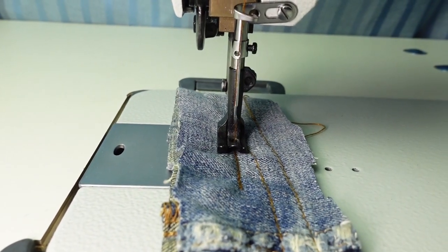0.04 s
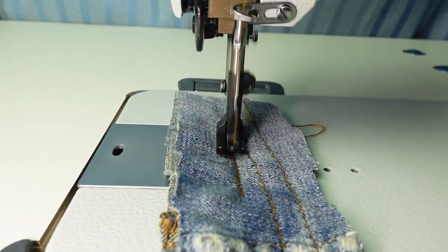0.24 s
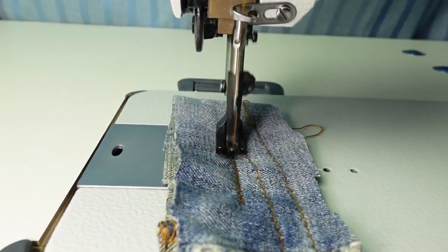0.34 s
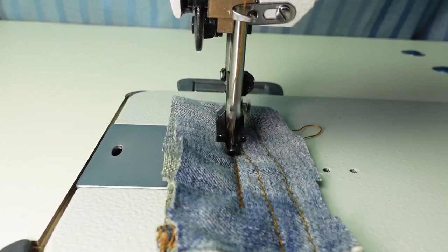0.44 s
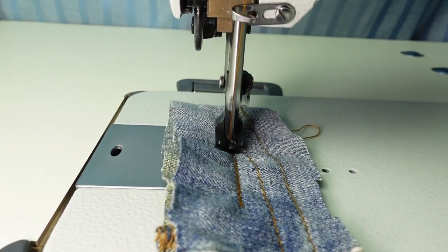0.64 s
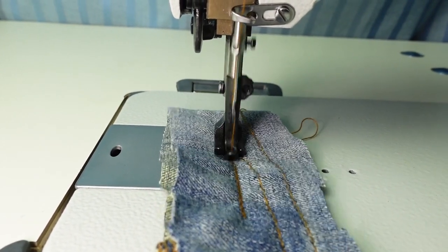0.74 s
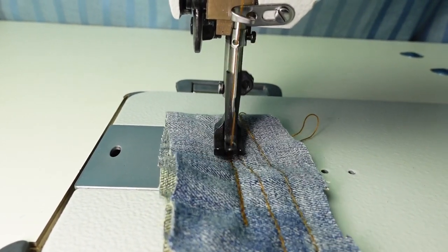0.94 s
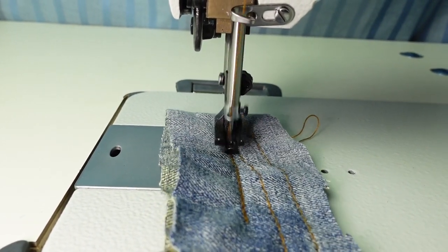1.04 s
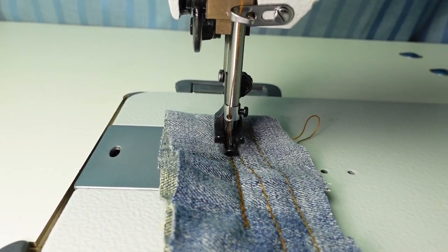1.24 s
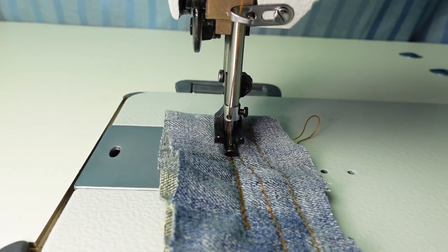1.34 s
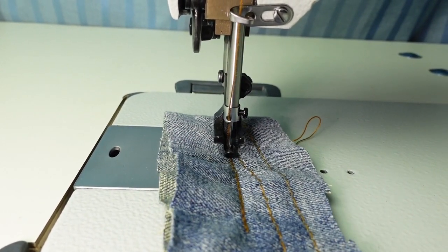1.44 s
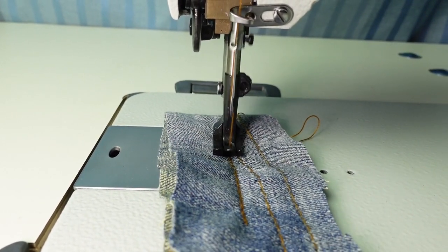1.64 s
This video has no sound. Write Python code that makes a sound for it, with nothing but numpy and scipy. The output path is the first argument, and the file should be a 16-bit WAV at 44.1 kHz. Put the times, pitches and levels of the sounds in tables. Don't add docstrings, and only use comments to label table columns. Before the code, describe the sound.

A heavy sewing machine starts up with a dense metallic clatter and low thrum, slows to separate clicks and knocks, pauses, then a sprung lever snaps loudly; close microphone in a small garage with short echo.

```python
import sys
import numpy as np
from scipy import signal
from scipy.fft import rfft, irfft
from scipy.io import wavfile
from scipy.ndimage import uniform_filter1d

SR = 44100
rng = np.random.default_rng(int(sys.argv[2]) if len(sys.argv) > 2 else 0)


def persist_wave(psi):
    counts = np.round(np.clip(psi, -1, 1) * 32767).astype(np.int16)
    wavfile.write(sys.argv[1], SR, np.atleast_2d(counts).T)


def invert_db(x):
    u = np.asarray(x, float) / 20
    return 10 ** u


N = 74970

# (pitch [Hz], level [dB], time to fade by 60 dB [s])
STEEL_MODES = [(1560, -11.5, 0.036), (1700, -0.5, 0.038), (2200, -6.5, 0.11), (2668, -17, 0.018),
               (2840, -5, 0.071), (3115, -9, 0.053), (3428, 4, 0.01), (3585, -32, 0.074),
               (4640, -11, 0.046), (5980, -3.5, 0.0063), (6895, -12, 0.11), (7470, -9.5, 0.026),
               (9570, -9, 0.009), (10940, -24, 0.013)]
# (pitch [Hz], level [dB], time to fade by 60 dB [s])
BED_MODES = [(325, -7, 0.12), (442, -14, 0.05), (489.4, -4.5, 0.059), (584.6, -3.5, 0.032), (653, -7, 0.03),
             (756, -3, 0.019), (915, -1.5, 0.029), (1070, -6.5, 0.11), (1192, -11.5, 0.12),
             (1465, -10.5, 0.035)]
TOP_HZ = 16150


def level(x, db):
    return x * invert_db(db) / np.sqrt(np.mean(x ** 2))


def top(x):
    return x / np.abs(x).max()


def colour(x, shape):
    hz, db = np.array(shape).T
    f = np.arange(N // 2 + 1) * SR / N + 1
    gain = invert_db(np.interp(np.log(f), np.log(hz), db))
    return irfft(rfft(x) * gain, N)


def band(x, edges_hz):
    return signal.lfilter(*signal.butter(2, edges_hz, "band", fs=SR), x)


def ring(x, hz, t60):
    pole = np.exp(2j * np.pi * hz / SR - np.log(1000) / (max(t60, .005) * SR))
    return signal.lfilter([1], [1, -pole], x).imag


def walk(rate):
    k = int(SR / rate)
    steps = np.repeat(rng.standard_normal(N // k + 1), k)
    return 0.75 * uniform_filter1d(uniform_filter1d(steps, k), k)[:N]


def favour(modes, hz, width):
    distance = np.log(np.array(modes)[:, 0] / hz[:, None])
    return 10 * np.exp(-(distance / width) ** 2)


def strike(times, peak_db, mode_db, modes, scrape_s, clatter_db, crack_db,
           clatter_hz=(830, 4100), crack_s=0.0082, crack_hz=(5600, 12480)):
    contact_rise_s, clatter_s, detune = 0.00068, 0.0089, .012
    t = np.arange(4000) / SR
    out = np.zeros(N + len(t))
    for s, db, gains, bright_db in zip(times, peak_db, mode_db, crack_db):
        chance = rng.standard_normal((4, len(t)))
        contact = chance[0] * np.exp(-t / scrape_s) * (1 - np.exp(-t / contact_rise_s))
        body = 0
        for gain, (hz, own_db, t60), shift in zip(gains, modes, chance[3]):
            body = body + invert_db(gain + own_db) * top(ring(contact, hz * (1 + detune * shift), t60))
        clatter = band(chance[1], clatter_hz) * np.exp(-t / clatter_s)
        crack = band(chance[2] * np.exp(-t / crack_s), crack_hz)
        hit = top(band(body, (301, TOP_HZ)))
        hit = hit + invert_db(clatter_db) * top(clatter) + invert_db(bright_db) * top(crack)
        start = int(s * SR)
        out[start:start + len(t)] += invert_db(db) * top(hit)
    return out[:N]


def garage():
    # (pitch [Hz], level [dB])
    air_shape = [(20, -11.5), (52, 0), (100, -3.5), (150, -12), (210, -30), (420, -24), (1100, -36.5),
                 (15500, -40)]
    # (pitch [Hz], level [dB])
    motor_tones = [(296, -71.5), (835, -75.5), (1757, -71.5)]
    t = np.arange(N) / SR
    whine = 0
    for hz, db in motor_tones:
        whine = whine + invert_db(db + 0.5 + 1.2 * walk(7.0)) * np.sin(2 * np.pi * hz * t)
    return level(colour(rng.standard_normal(N), air_shape), -55.5) + whine


def bird():
    # (time [s], length [s], start pitch [Hz], end pitch [Hz], level [dB])
    chirps = [
        (1.261, 0.035, 4500, 4100, -58),
        (1.313, 0.04, 3760, 3310, -55.5),
        (1.357, 0.067, 3500, 3340, -60.5),
    ]
    flutter_per_s, tail_s = 700, .04
    t, out = np.arange(N) / SR, 0
    for s, length, start_hz, end_hz, db in chirps:
        u = np.clip((t - s) / length, 0, 1)
        tail = np.exp(-np.clip(t - s - length, 0, None) / tail_s)
        phase = 2 * np.pi * np.cumsum(start_hz + (end_hz - start_hz) * u) / SR
        flutter = walk(flutter_per_s) * np.sin(phase) + walk(flutter_per_s) * np.cos(phase)
        out = out + invert_db(db) * np.sin(np.pi / 2 * u) * tail * flutter
    return out


def jolts():
    # (time of the crest [s], peak level [dB], pitch [Hz], length [cycles])
    swings = [(0.244, -34.5, 214, 3), (.268, -31.5, 137, 2.2), (0.311, -30, 206, 3.3),
              (0.351, -25.5, 171, 2.2), (0.349, -36, 100, 2.6), (0.406, -29.5, 215, 1.2),
              (.41, -43.5, 100, 6.8), (0.471, -33, 105, 0.94), (.52, -38, 97, 1.96), (0.588, -42, 182, 2.2),
              (0.634, -43, 196, 2.3), (0.726, -40.5, 111, 3.1), (0.758, -47, 141, 2.6), (.8, -43, 87, 2.7),
              (0.843, -42.5, 86, 2.6), (0.843, -53, 237, 6), (0.903, -34.5, 153, 1.6),
              (0.929, -45, 330.5, 13), (.97, -48.5, 192, 7.1), (1.0, -37, 93, 3.7), (1.043, -43, 91, 4.5),
              (1.11, -34.5, 135.5, 2.2), (1.173, -34.5, 87, 1.3), (1.222, -46, 100, 1.3),
              (1.189, -46.5, 433, 12.5), (1.27, -50, 84, 1.9), (1.328, -50.5, 88, 1.6),
              (1.47, -43.5, 100, 1.1), (1.598, -45, 271, 2.1), (1.64, -39, 232, 4.4),
              (1.667, -38.5, 171, 3.4), (1.646, -43.5, 71, 2), (1.69, -41, 72, 2)]
    s, db, hz, length = np.array(swings).T[:, :, None]
    cycles = (np.arange(N) / SR - s) * hz
    rise = np.where(cycles < 0, 0.62, 1)
    swell = np.exp(-(cycles / length / rise) ** 2)
    swing = np.cos(2 * np.pi * (cycles + rng.random(s.shape)))
    rough = invert_db(2.2 * walk(90))
    return rough * (invert_db(db) * swell * swing).sum(axis=0)


def drive():
    # (time [s], level [dB])
    load = [(.14, -76.5), (0.192, -60.5), (.225, -48.5), (.27, -36), (.33, -34.5), (.38, -37.5),
            (0.459, -39), (.55, -52), (.62, -50), (.70, -51.5), (.80, -43.5), (.97, -46.5), (1.1, -48.5),
            (1.165, -46), (1.2, -58.5), (1.3, -70), (1.55, -62), (1.61, -54.5)]
    # (pitch [Hz], level [dB], time to fade by 60 dB [s])
    table_modes = [(100, -14.5, 0.45), (147, 0.5, 0.17), (189, 3, 0.12), (231, 9, 0.058)]
    # (pitch [Hz], level [dB per Hz])
    hiss_shape = [(200, -2), (500, 2), (1700, 4), (3500, -7), (5500, -9), (10000, -21.5), (16000, -20)]
    teeth_per_s, scatter_db = 1400, 7

    def rings(x, modes):
        total = 0
        for hz, db, t60 in modes:
            total = total + invert_db(db) * ring(x * invert_db(7.5 * walk(25.02)), hz, .55 * t60)
        return level(total, 0)

    meets = rng.random(N) < teeth_per_s / SR
    force = invert_db(scatter_db * np.minimum(rng.exponential(size=N), 3))
    teeth = meets * force * rng.standard_normal(N)
    uneven = invert_db(2.3 * walk(60.5) + 4.4 * walk(500))
    hiss = level(colour(rng.standard_normal(N) * uneven, hiss_shape), -1.5)
    rattle = invert_db(-9.5) * rings(teeth, STEEL_MODES) + invert_db(-2) * rings(teeth, BED_MODES) + hiss
    thrum = rings(rng.standard_normal(N), table_modes)
    s, load_db = np.array(load).T
    return (rattle + thrum) * invert_db(np.interp(np.arange(N) / SR, s, load_db))


def pings():
    # (time [s], peak level [dB], pitch [Hz])
    high_pings = [(0.278, -40, 9360), (.2635, -46, 11600), (.289, -42, 9500), (0.303, -30, 9270),
                  (.334, -34.5, 8750), (0.359, -31.5, 5930), (0.399, -33.5, 9200), (.425, -35, 11400),
                  (.51, -49, 9700), (.623, -39, 12100), (0.712, -38, 9400), (0.733, -44, 9700),
                  (0.804, -45, 9900), (0.839, -29.5, 11350), (.85, -42, 9800), (.8982, -44, 7540),
                  (.941, -45, 9600), (1.018, -42, 11600), (1.0767, -55, 9900), (1.1202, -47, 9560),
                  (1.1402, -32.5, 7400), (1.65, -38.5, 8540)]
    out = 0
    for s, db, hz in high_pings:
        out = out + strike([s], [db], [[0]], [(hz, 0, 0.0079)], 0.0012, -40, [-12])
    return out


def lever():
    # (time [s], peak level [dB], crack against the ring [dB])
    snaps = [
        (1.4541, -10.5, 4),
        (1.4570, -13, -15),
        (1.4605, -15.5, -18),
        (1.4655, -24, -15),
        (1.471, -23, -14),
        (1.48, -31, -12),
    ]
    # (pitch [Hz], level [dB], time to fade by 60 dB [s])
    lever_modes = [(339, -17.5, 0.21), (523, -8, 0.024), (730, -5, 0.0053), (1080, -23, 0.013),
                   (1640, -10.5, 0.018), (2060, 3, 0.019), (2480, -9, 0.014), (2880, -2, 0.0049),
                   (3180, 7.5, 0.019), (3520, 2, 0.024), (4370, -16, .01)]
    s, db, crack_db = np.array(snaps).T
    gains = np.zeros((len(s), len(lever_modes)))
    return strike(s, db, gains, lever_modes, 0.001, -4.0, crack_db,
                  clatter_hz=(1670, 3900), crack_s=0.001, crack_hz=(7400, 10740))


def knocks():
    # (time [s], peak level [dB], favoured pitch [Hz], second favoured pitch [Hz])
    blows = [(0.162, -49, 476, 885), (0.181, -36.5, 915, 610), (0.247, -28.5, 440, 335),
             (0.302, -20, 1003, 435), (0.319, -17.5, 552, 1000), (0.397, -28.5, 910, 603),
             (0.424, -20.5, 1070, 480), (0.528, -32, 1040, 596), (0.602, -33.5, 1070, 760),
             (0.63, -21.5, 626, 713), (0.638, -29.5, 1080, 475), (0.769, -31, 1040, 600),
             (0.802, -37, 900, 604), (0.843, -21.5, 650, 1070), (0.988, -34, 337, 910),
             (1.024, -22.5, 1100, 650), (1.1372, -22.5, 417, 325), (1.142, -23, 928, 1170),
             (1.162, -41, 1080, 325), (1.175, -29.5, 770, 434), (1.408, -39, 650, 1040),
             (1.453, -33, 339, 477), (1.57, -37, 563, 900), (1.598, -40.5, 323, 473),
             (1.62, -39.5, 430, 325), (1.64, -41.5, 896, 475), (1.692, -37, 710, 1070)]
    s, db, hz, second_hz = np.array(blows).T
    gains = 1.7 * favour(BED_MODES, hz, .08) + 1.1 * favour(BED_MODES, second_hz, .1)
    crack_db = np.full(len(s), -40.0)
    return strike(s, db, gains, BED_MODES, 0.0072, -12.5, crack_db, clatter_hz=(378, 1350))


def clicks():
    # (time [s], peak level [dB], brightness against the click [dB], favoured pitch
    # [Hz])
    steel_clicks = [(0.184, -32.5, -32, 1710), (0.2193, -40.5, -31, 1680), (0.261, -29, -26, 1700),
                    (0.2783, -26.5, -17, 1690), (0.2878, -23, -8, 3350), (0.3036, -19, -12.5, 3300),
                    (0.3185, -17.5, -19, 1700), (0.333, -26, -17, 3400), (0.398, -23.5, -10, 3430),
                    (0.4248, -27, -21, 1460), (0.4784, -30.5, -32, 1700), (0.508, -38.5, -19, 2730),
                    (0.5311, -28.5, -17, 1640), (0.5782, -33.5, -12.5, 3430), (0.6212, -33.5, -15, 1600),
                    (0.6361, -26.5, -10, 2200), (0.6694, -36.5, -14, 1780), (0.7118, -22.5, -13, 2190),
                    (0.7333, -33.5, -6, 2030), (0.7699, -25.5, -15.5, 1550), (0.8037, -21.5, -11, 3450),
                    (0.838, -28.5, -18, 1680), (0.939, -33.5, -26, 1780), (0.9597, -34, -18, 1560),
                    (1.018, -28, -16, 1580), (1.026, -23.5, -8, 1564), (1.0517, -32, -13, 3620),
                    (1.1198, -43, -19, 1600), (1.1401, -31, -31, 1600), (1.572, -37, -35, 1735),
                    (0.3469, -36, -18, 1620), (0.3696, -32, -14, 1700), (0.5357, -33.5, -14, 1570),
                   (0.5843, -41.5, -14, 1580), (0.859, -37.5, -16, 1640), (0.8983, -32, -33, 1710),
                   (0.9974, -33.5, -28, 1680), (1.0767, -40, -24, 2200), (1.0929, -35.5, -30, 2200),
                   (1.6451, -28.5, -15.5, 1860), (1.6924, -34.5, -14, 2900)]
    s, db, bright_db, hz = np.array(steel_clicks).T
    extra_bright = bright_db + 11.5
    high = np.array(STEEL_MODES)[:, 0] > 6500
    gains = 5.5 * rng.standard_normal((len(s), len(STEEL_MODES)))
    gains = gains + np.outer(extra_bright, high) + favour(STEEL_MODES, hz, 0.04)
    return strike(s, db, gains, STEEL_MODES, 0.0055, -3, -11.5 + extra_bright)


def scene():
    room_t60_s, room_db, room_damp_hz = 0.13, -16, 3500
    machine = clicks() + knocks() + lever() + pings() + jolts() + drive()
    near = band(machine, (72, 14500))
    t = np.arange(SR // 2) / SR
    tail = rng.standard_normal(len(t)) * invert_db(-60 * t / room_t60_s) * np.clip(t / 0.0093, 0, 1)
    tail = signal.lfilter(*signal.butter(2, room_damp_hz, fs=SR), tail) + invert_db(-5) * tail
    wet = signal.fftconvolve(near, tail / np.sqrt(np.sum(tail ** 2)))[:N]
    return (near + invert_db(room_db) * wet + bird() + garage())[None]


def top_cut(x):
    return signal.sosfilt(signal.butter(12, 16640, fs=SR, output="sos"), x)


def record(dry):
    low_pass = signal.ellip(8, .2, 70, TOP_HZ, fs=SR, output="sos")
    mix = signal.sosfilt(low_pass, dry)
    return top_cut(mix)


dry = scene()
out = record(dry)
persist_wave(out)
```